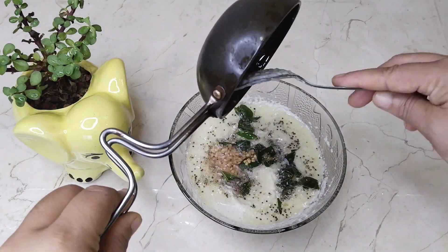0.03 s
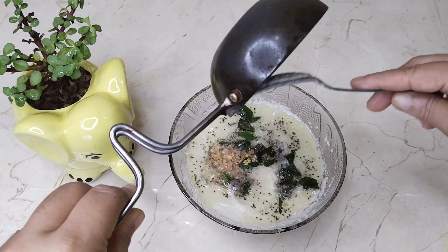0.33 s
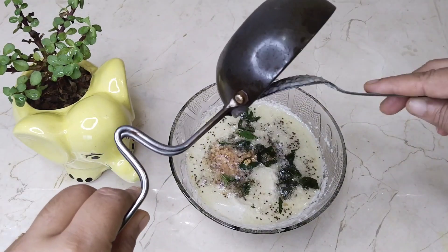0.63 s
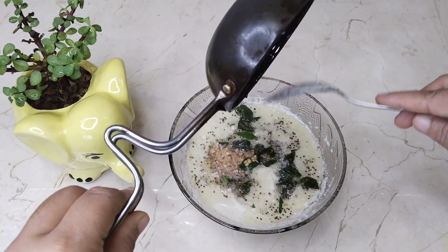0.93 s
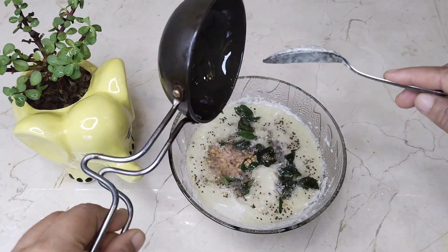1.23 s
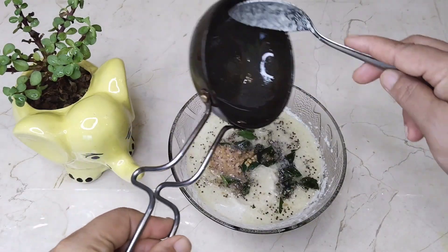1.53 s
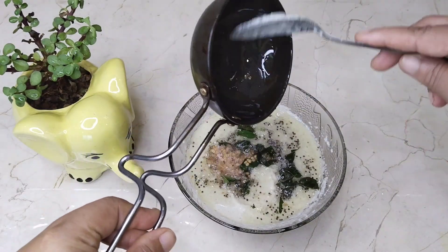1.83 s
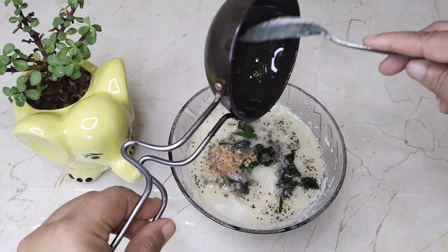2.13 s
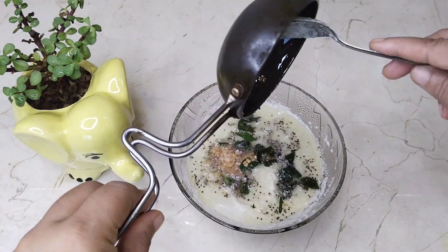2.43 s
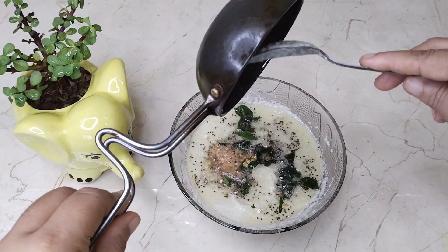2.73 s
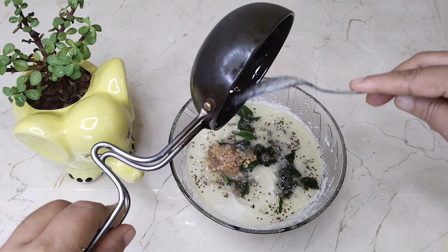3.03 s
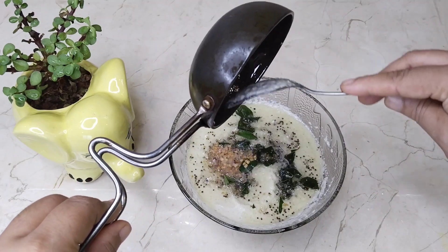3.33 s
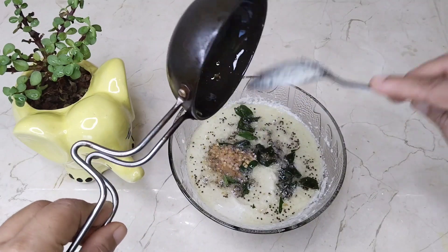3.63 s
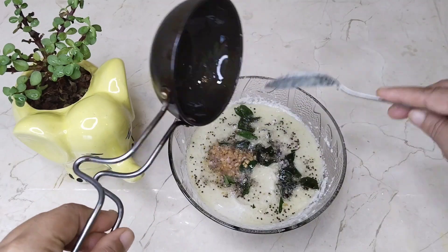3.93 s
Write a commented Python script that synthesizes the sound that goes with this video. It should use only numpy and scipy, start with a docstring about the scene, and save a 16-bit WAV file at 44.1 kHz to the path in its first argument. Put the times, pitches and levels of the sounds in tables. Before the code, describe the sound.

A dense crackle of hot oil in batter, with spoon knocks and scrapes on a pan.

```python
"""Hot oil on wet batter.

Tempering oil sizzles in a glass bowl, close up in a kitchen. Tiny steam bubbles burst in a
dense crackle that slowly calms; a few spit loudly. A steel spoon taps, scrapes and squeals
as it gets the last oil out of a small pan held above the bowl. The room rumbles faintly."""
import sys
import numpy as np
from scipy import signal
from scipy.io import wavfile

SR = 44100
rng = np.random.default_rng(int(sys.argv[2]) if len(sys.argv) > 2 else 0)


def transcribe(u):
    """Save the signal u as a 16-bit wav file named by the first command-line argument.

    u: samples, shape (n,) or (channels, n), limited to [-1, 1]; the rate is SR.
    q: integer samples, one column per channel.
    """
    v = np.clip(np.atleast_2d(u).T, -1, 1)
    q = np.round(v * 32767).astype(np.int16)
    wavfile.write(sys.argv[1], SR, q)


N = 176400

# Spectrum of bubbles and fizz. Each row: frequency in Hz, gain in dB.
SIZZLE_EQ = [(150, -32), (450, -10.5), (850, -11), (1080, -5), (1350, 3), (1800, -2), (2500, -3),
             (3200, -6), (4100, -0.5), (5000, -5.5), (6200, -8), (7400, -6.5), (8300, -0.5), (9100, 4.5),
             (10200, -1), (11200, -7), (12500, -17), (15500, -19)]
# Spectrum of dry ticks. Each row: frequency in Hz, gain in dB.
TICK_EQ = [(200, -37), (800, -20), (1400, 4), (2500, 2.5), (4200, -1.5), (6500, -4.5), (9200, -2),
           (11500, 4), (15500, -2)]
# How hard the oil boils. Each row: time in seconds, gain in dB.
BOIL_CURVE = [(0, 0), (.6, -0.5), (.77, -0.95), (1.4, -1), (2.1, -0.5), (2.6, -2.5), (3.0, -2), (3.17, -3),
              (3.4, -2.5), (3.7, -4), (4, -4.5)]
# Loud spits of oil. Each row: start in seconds, level in dB, pitch in Hz.
OIL_SPITS = [(.2897, -12.5, 9200), (.4524, -28, 9150), (.5177, -16.5, 9600), (.8826, -15.5, 4000),
             (1.0022, -10.5, 9700), (1.430, -15.5, 8050), (1.5438, -24, 9800), (1.552, -24, 8900),
             (1.6266, -10, 9050), (1.7193, -23, 9000), (1.771, -15, 8560), (1.8765, -22, 8900),
             (1.8985, -18, 10100), (1.9241, -18.5, 3900), (1.9874, -20, 9800), (2.14, -18, 3900),
             (2.1584, -13.5, 9000), (2.2166, -21, 10700), (2.4086, -15, 9300), (2.7905, -15.5, 9000),
             (2.9113, -17, 10700), (3.0674, -26, 9300), (3.1138, -16, 9500), (3.283, -16, 9050),
             (3.594, -18, 10800), (3.739, -18, 9000), (3.843, -19, 4100)]
# Loudness of larger bubbles. Each row: time in seconds, level in dB.
PLINK_CURVE = [(0, -42), (1.15, -42), (1.4, -36), (1.9, -44.5), (2.5, -49), (3.3, -46), (3.8, -42.5),
               (4, -53)]
# Spoon hits on the pan. Each row: start in seconds, knock peak in dB, clink peak in dB.
SPOON_TAPS = [(.034, -13, -36), (.656, -9.5, -16.5), (.791, -15, -16.5), (.882, -16.5, -28),
              (1.001, -13.5, -41), (1.010, -15.5, -45), (1.024, -15, -34), (1.209, -16.5, -19),
              (1.312, -18.5, -44), (1.355, -15.5, -44), (1.5435, -12.5, -17), (1.586, -15, -26),
              (1.6615, -14, -42), (1.768, -8, -37), (1.809, -14, -40), (2.0005, -4.5, -28),
              (2.006, -11, -35), (2.086, -11, -28), (2.277, -12.5, -38), (2.3395, -11.5, -28),
              (2.528, -13, -21), (2.8755, -11.5, -20), (3.022, -19, -40), (3.231, -19, -23),
              (3.252, -17, -43), (3.3462, -16, -19), (3.762, -15, -30)]
# Spectrum of a knock. Each row: frequency in Hz, gain in dB.
KNOCK_EQ = [(40, -85), (130, -33), (330, -6.5), (830, -8.5), (1080, 2), (1380, 16), (1900, 3),
            (2700, -14.5), (3500, -8.5), (5000, -4), (7200, -5.5), (11000, -1.5), (15500, -20)]
# Spoon strokes. Each row: start and length in seconds, ring, sing and rasp in dB, ring pitch in Hz.
SPOON_SCRAPES = [(0, 0.023, -30.5, -43, -38, 1435), (0.029, 0.11, -32, -39, -35, 1395),
                 (0.263, 0.046, -32.5, -46, -36.5, 1410), (0.328, 0.066, -38, -40, -30.5, 1403),
                 (0.546, 0.14, -35.5, -44.5, -35.5, 1406), (0.796, 0.043, -47, -50, -35.5, 1404),
                 (1.661, 0.08, -30.5, -55, -43, 1490), (1.737, 0.063, -30, -48, -34.5, 1370),
                 (2.003, 0.048, -32.5, -46, -35, 1390), (2.084, 0.018, -24, -37, -25.5, 1410),
                 (2.276, 0.028, -29.5, -50, -37, 1405), (2.335, 0.046, -33, -44, -33.5, 1316),
                 (2.375, 0.03, -39, -30.5, -41, 1340), (2.527, 0.0093, -27, -37, -36, 1420),
                 (2.578, 0.088, -32.5, -45, -34.5, 1405), (2.639, 0.1, -40.5, -42.5, -36, 1515),
                 (2.878, 0.029, -35.5, -36, -33.5, 1334), (2.93, 0.081, -39.5, -40, -39.5, 1390),
                 (3.246, 0.027, -41, -47, -35.5, 1420), (3.346, 0.093, -37.5, -38, -34.5, 1394)]
# Spoon bites. Each row: start and length in seconds, lower and upper tone in dB, upper tone in Hz.
SPOON_SQUEALS = [(0, 0.015, -30, -51, 11500), (1.748, .026, -40, -36, 11700),
                 (2.002, .024, -36, -41, 11200), (2.048, 0.036, -29.5, -40, 11250),
                 (2.078, 0.016, -37, -27.5, 11100), (2.1, .075, -58, -48, 11300),
                 (2.278, 0.081, -36, -43, 11200), (2.335, 0.046, -41, -42, 11300),
                 (2.527, .018, -34, -37, 11300)]
# Damped pan modes. Each row: frequency in Hz, width in Hz, gain in dB.
DAMPED_MODES = [(1933, 460, 0.5), (2317, 410, 1), (2950, 920, 1), (3366, 370, -0.5), (3900, 660, -3.5),
                (5110, 400, -9)]
# Clear pan modes. Each row: frequency in Hz, width in Hz, gain in dB.
CLEAR_MODES = [(2695, 130, 1), (3590, 120, -2), (5170, 220, -20)]
# Spectrum of the room rumble. Each row: frequency in Hz, gain in dB.
RUMBLE_EQ = [(48, -35), (70, -15), (100, 0.5), (200, 3.5), (500, 1.5), (900, -27), (3000, -28)]

SLIPS_PER_S, SLIP_SPREAD_DB = 3000, 1.5


def sizzle(bubbles_per_s=2800, bands=32, decay_s=0.00043, ticks_per_s=480, spots=4):
    """Steam bubbles of all sizes burst with a brief ring, among dry ticks and fine fizz."""
    bubble_db, tick_db, fizz_db, surge_db = -32, -39.5, -37, 1
    t = np.arange(0, .006, 1 / SR)
    bubbles = np.zeros(N)
    for hz in np.linspace(800, 15000, bands):
        ring = early_reflections(np.exp(-t / decay_s) * np.sin(2 * np.pi * hz * t))
        bursts = clicks(bubbles_per_s / bands, spread_db=4)
        bubbles += unit(signal.oaconvolve(bursts, ring)[:N])
    ticks = sum(early_reflections(clicks(ticks_per_s / spots, spread_db=4.6)) for _ in range(spots))
    fizz = rng.standard_normal(N)
    layers = (bubbles, SIZZLE_EQ, bubble_db), (ticks, TICK_EQ, tick_db), (fizz, SIZZLE_EQ, fizz_db)
    boil = envelope(BOIL_CURVE) * amp(surge_db * wander(per_s=14))
    return boil * sum(amp(db) * unit(colour(x, eq)) for x, eq, db in layers)


def spit(db, hz, rise_s=0.00022, decay_s=0.00043, snap_gain=.6):
    """One large bubble bursts: a dry snap and a very short, high ring."""
    t = np.arange(0, .006, 1 / SR)
    decay = np.exp(-t / decay_s)
    shape = (1 - np.exp(-t / rise_s)) * decay
    snap = unit(resonate(rng.standard_normal(len(t)), hz, width_hz=hz)) * decay
    return amp(db) * shape / shape.max() * (np.sin(2 * np.pi * hz * t) + snap_gain * snap)


def plinks(per_s=200, bands=10, low_hz=3870, high_hz=4460, decay_s=0.001):
    """Larger bubbles in the batter ring a little longer, at several pitches."""
    t = np.arange(0, .012, 1 / SR)
    bubbles = np.zeros(N)
    for hz in np.linspace(low_hz, high_hz, bands):
        ring = np.exp(-t / decay_s) * np.sin(2 * np.pi * hz * t)
        bubbles += signal.oaconvolve(clicks(per_s / bands, spread_db=3), ring)[:N]
    return envelope(PLINK_CURVE) * unit(bubbles)


def plops(per_s=70, db=-44):
    """Small drips and blisters plop in the wet batter, following the boil."""
    drips = resonate(clicks(per_s, spread_db=1), hz=1350, width_hz=420)
    return envelope(BOIL_CURVE) * amp(db) * unit(drips)


def tap(knock_db, clink_db, chatter_gain=.09, chatter_s=.003, size=3000):
    """Steel hits steel and chatters briefly: a damped knock and a clink of the pan."""
    t = np.arange(size) / SR
    force = (t == 0) + chatter_gain * rng.standard_normal(size) * np.exp(-t / chatter_s)
    parts = (colour(force, KNOCK_EQ), knock_db), (pan(force), clink_db)
    return sum(amp(db) * x / abs(x).max() for x, db in parts)


def scrape(length_s, ring_db, sing_db, rasp_db, ring_hz, size=10000):
    """Quick slips of the spoon drive a low, sagging ring, the pan's clear modes and a gritty rasp."""
    sag, jitter, tone_share, grit_db = 0.0804, 0.02, 0.39, -2.5
    t = np.arange(size) / SR
    slips = clicks(SLIPS_PER_S, SLIP_SPREAD_DB, size)
    pitch_hz = ring_hz * (1 + sag * (.5 - np.minimum(t / length_s, 1)))
    stick_slip = sine(pitch_hz * (1 + jitter * wander(per_s=300, size=size)))
    rough = resonate(slips, pitch_hz, width_hz=224)
    ring = (1 - tone_share) * unit(rough) + tone_share * unit(stick_slip)
    sing = pan_singing(slips)
    grit = np.diff(resonate(slips, hz=2950, width_hz=2870), prepend=0)
    rasp = unit(pan(slips)) + amp(grit_db) * unit(grit)
    return stroke(pressure(t, length_s), [(ring, ring_db), (sing, sing_db), (rasp, rasp_db)])


def squeal(length_s, lower_db, upper_db, upper_hz, size=10000):
    """The spoon's edge sticks and slips: two thin tones with hiss between them."""
    slips = clicks(SLIPS_PER_S, SLIP_SPREAD_DB, size)
    lower = resonate(slips, hz=7170, width_hz=170)
    upper = resonate(slips, upper_hz, width_hz=190)
    hiss = resonate(slips, hz=8800, width_hz=1300)
    press = pressure(np.arange(size) / SR, length_s)
    return stroke(press, [(lower, lower_db), (upper, upper_db), (hiss, lower_db - 3)])


def pressure(t, length_s, attack_s=0.0012, release_s=0.013):
    """The spoon bites quickly, holds and lets go."""
    return np.minimum(t / attack_s, 1) * np.exp(-np.maximum(t - length_s + release_s, 0) / release_s)


def pan(force):
    """A force rings the pan's damped modes."""
    return sum(amp(db) * resonate(force, hz, width_hz) for hz, width_hz, db in DAMPED_MODES)


def pan_singing(slips, bend_depth=.02, swell_db=2.5, drifts_per_s=25):
    """The pan's clear modes bend and swell as the spoon slides."""
    bend = 1 + bend_depth * wander(drifts_per_s, len(slips))
    sing = np.zeros(len(slips))
    for hz, width_hz, db in CLEAR_MODES:
        gain = amp(db + swell_db * wander(drifts_per_s, len(slips)))
        sing += gain * unit(resonate(slips, hz * bend, width_hz))
    return sing


def thud(db=-36.5, decay_s=0.024, band_hz=(280, 1100), size=6000):
    """A dull bump as the pan is tipped back."""
    body = signal.lfilter(*signal.butter(2, band_hz, "band", fs=SR), rng.standard_normal(size))
    return stroke(np.exp(-np.arange(size) / SR / decay_s), [(body, db)])


def early_reflections(x, db=-8.5):
    """Adds reflections from bowl and counter, different for every spot."""
    return x + amp(db) * reverb(x, t60_s=0.0077, size=1200)


def reverb(x, t60_s, gap_s=.0007, size=16000):
    """A diffuse tail of reflections."""
    t = np.arange(size) / SR
    tail = rng.standard_normal(size) * amp(-60 * t / t60_s) * (t > gap_s)
    return signal.oaconvolve(x, tail / np.linalg.norm(tail))[:len(x)]


def room_tone(rumble_db=-52, hum_db=-60, hum_hz=201, waver_hz=3):
    """Low kitchen rumble with a faint, wavering hum."""
    hum = sine(hum_hz + waver_hz * wander(per_s=20))
    rumble = colour(rng.standard_normal(N), RUMBLE_EQ)
    return amp(rumble_db) * unit(rumble) + amp(hum_db) * unit(hum)


def stroke(shape, parts):
    """Mixes (sound, dB) parts under one envelope."""
    return np.sqrt(np.mean(shape ** 2)) * sum(amp(db) * unit(shape * x) for x, db in parts)


def clicks(per_s, spread_db, size=N):
    """Random impulses, many small and a few large."""
    strength = amp(spread_db * np.minimum(rng.exponential(1, size), 3.8))
    return strength * rng.choice([-1, 1], size) * (rng.random(size) < per_s / SR)


def resonate(x, hz, width_hz):
    """Steep resonance at a pitch or along a pitch curve."""
    carrier = np.exp(2j * np.pi * np.cumsum(hz * np.ones(len(x))) / SR)
    pole = np.exp(-np.pi * width_hz / SR)
    baseband = signal.lfilter([(1 - pole) ** 2], [1, -2 * pole, pole * pole], x / carrier)
    return 2 * (carrier * baseband).real


def colour(x, eq, size=4096):
    """Minimum-phase filter through (Hz, dB) points."""
    hz, db = np.transpose(eq)
    bins_hz = abs(np.fft.fftfreq(size, 1 / SR))
    log_gain = np.log(amp(np.interp(np.log(bins_hz + 1), np.log(hz), db)))
    taps = np.fft.ifft(np.exp(np.conj(signal.hilbert(log_gain)))).real
    return signal.fftconvolve(x, taps[:size // 2])[:len(x)]


def envelope(curve):
    """Gain per sample through (s, dB) points."""
    return amp(np.interp(np.arange(N) / SR, *np.transpose(curve)))


def wander(per_s, size=N):
    """Smooth random drift."""
    return np.interp(np.arange(size) * per_s / SR, np.arange(4000), rng.standard_normal(4000))


def sine(hz):
    """Tone along a pitch curve."""
    return np.sin(2 * np.pi * np.cumsum(hz) / SR)


def amp(db):
    """Decibels to gain."""
    return 10 ** (np.asarray(db) / 20)


def unit(x):
    """Scales to rms 1."""
    return x / np.sqrt(np.mean(x ** 2) + 1e-20)


def add(mix, start_s, sound):
    """Mixes a sound in at its start time."""
    part = mix[max(0, round(start_s * SR)):][:len(sound)]
    part += sound[:len(part)]


def scene(thud_s=1.545, reverb_db=-7.5):
    """Oil and spoon close by, in the short reverberation of the kitchen."""
    direct = sizzle() + plinks() + plops()
    events = (OIL_SPITS, spit), (SPOON_TAPS, tap), (SPOON_SCRAPES, scrape), (SPOON_SQUEALS, squeal)
    for table, source in events:
        for start_s, *row in table:
            add(direct, start_s, source(*row))
    add(direct, thud_s, thud())
    return (direct + amp(reverb_db) * reverb(direct, t60_s=0.28) + room_tone())[None]


def record(dry, low_hz=45, high_hz=15800):
    """Bass roll-off and steep treble limit."""
    thin = signal.lfilter(*signal.butter(2, low_hz, "high", fs=SR), dry)
    lowpass = signal.firwin(511, high_hz, window=("kaiser", 9), fs=SR)
    return signal.oaconvolve(thin, lowpass[None], "same")


dry = scene()
out = record(dry)
transcribe(out)
```